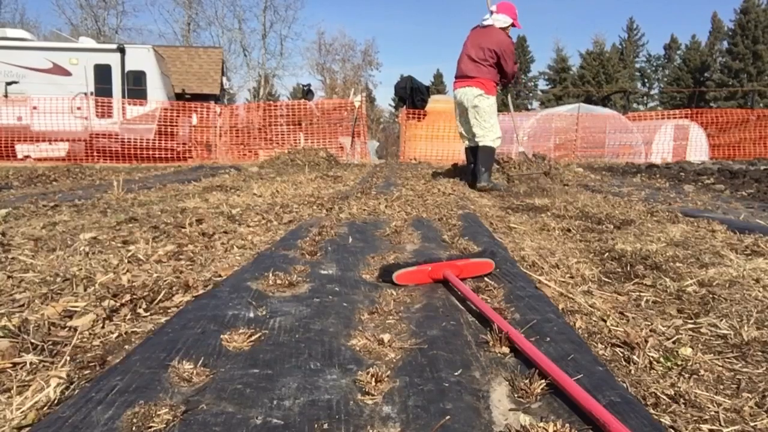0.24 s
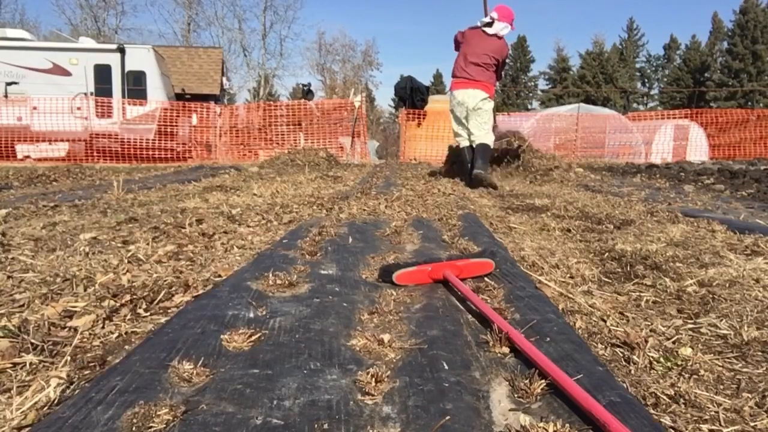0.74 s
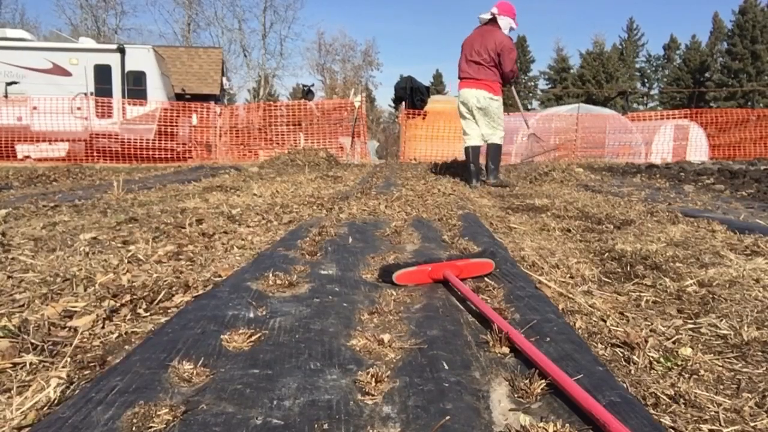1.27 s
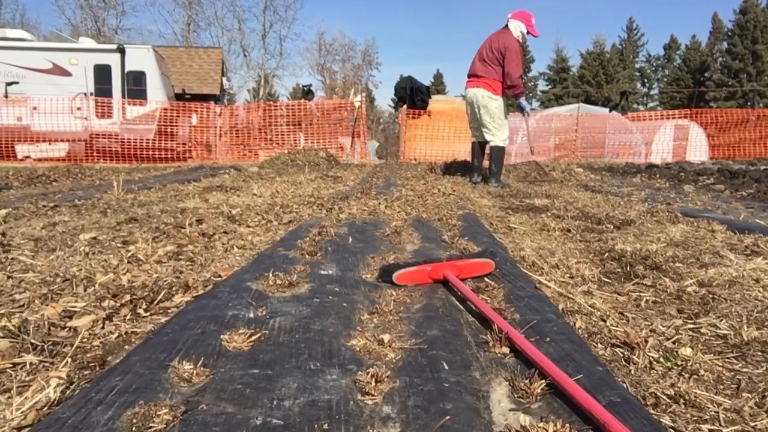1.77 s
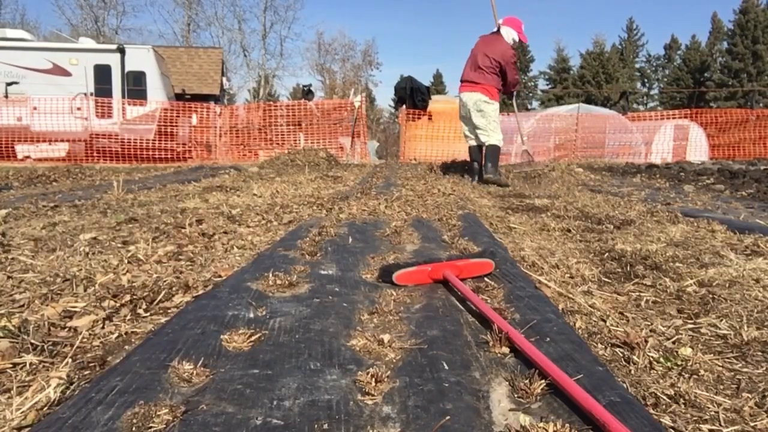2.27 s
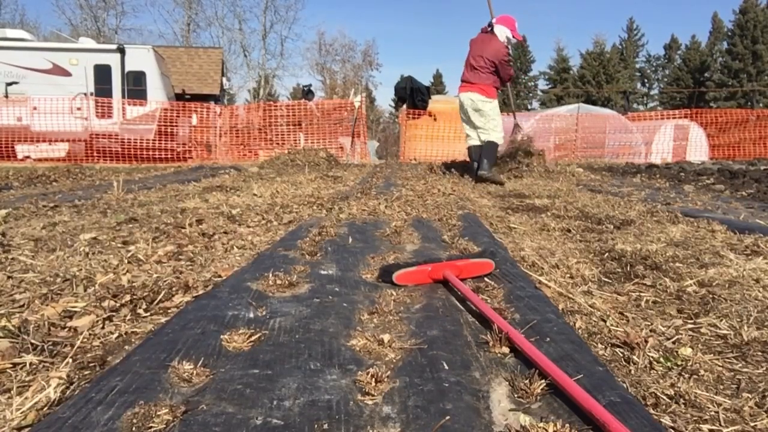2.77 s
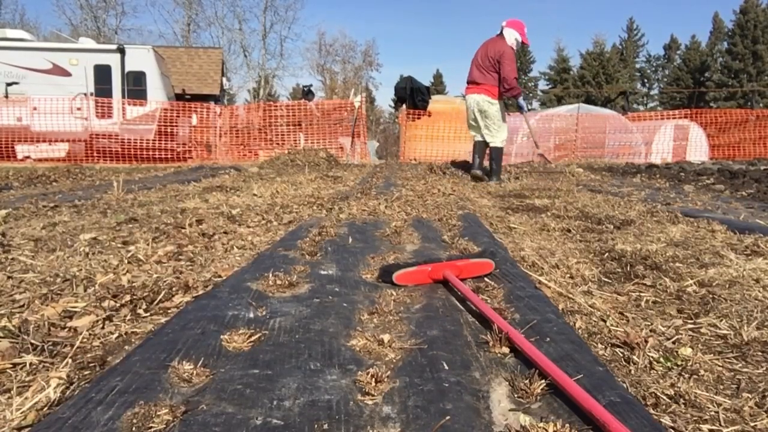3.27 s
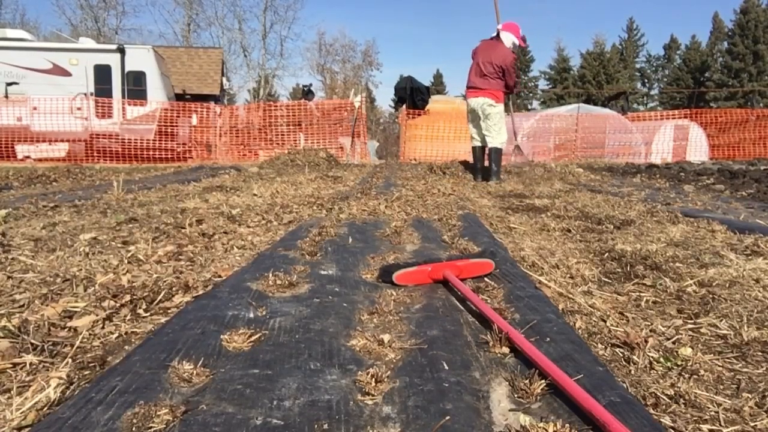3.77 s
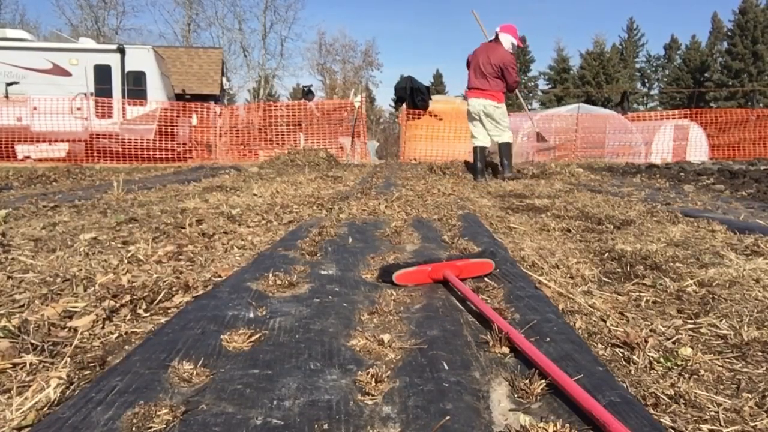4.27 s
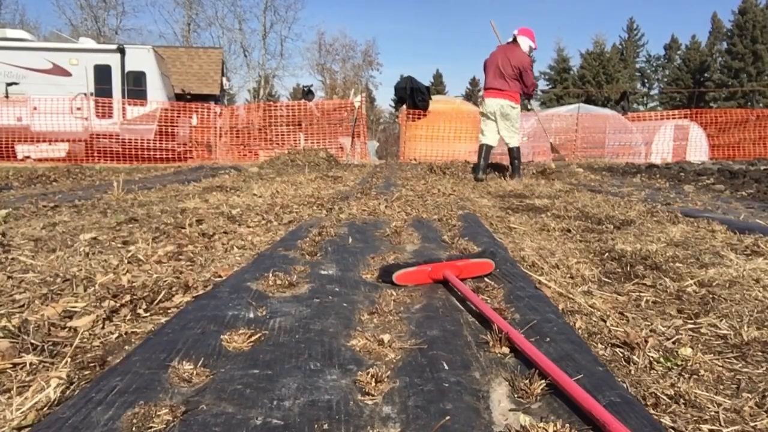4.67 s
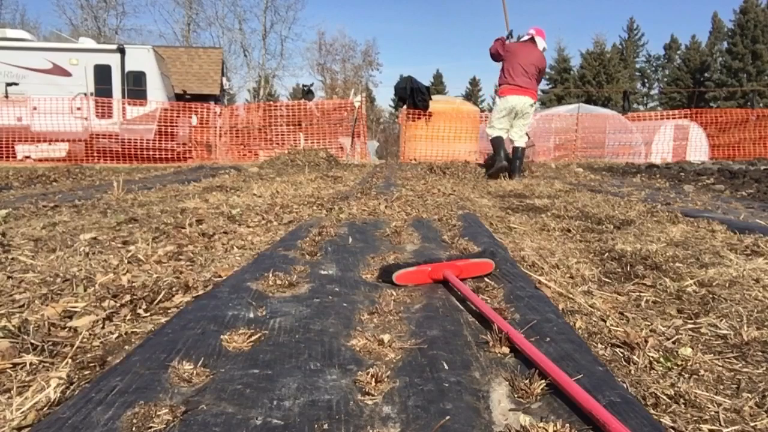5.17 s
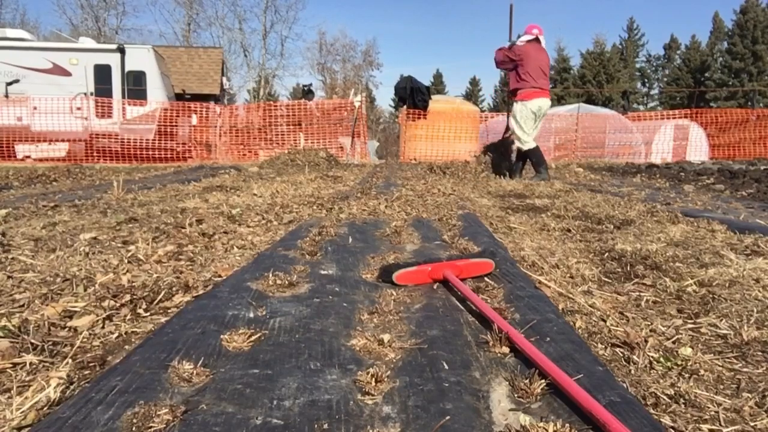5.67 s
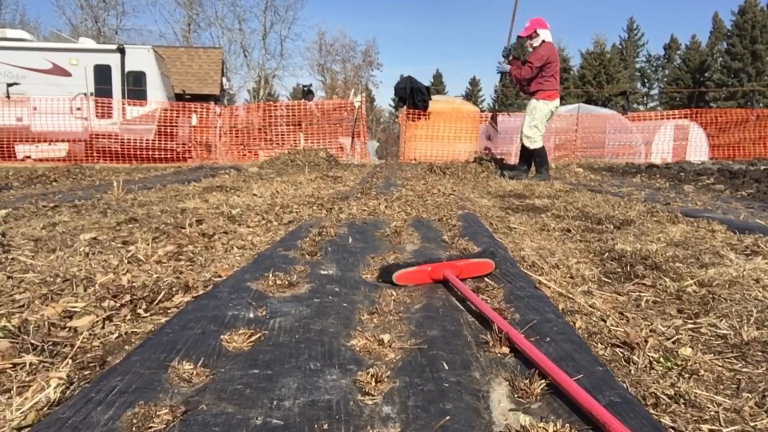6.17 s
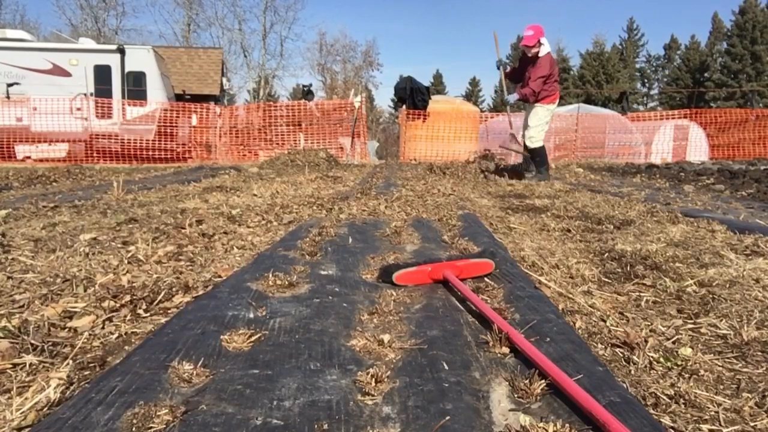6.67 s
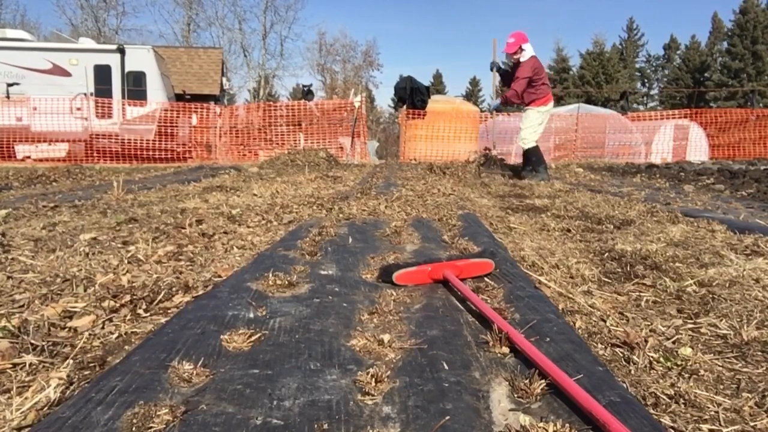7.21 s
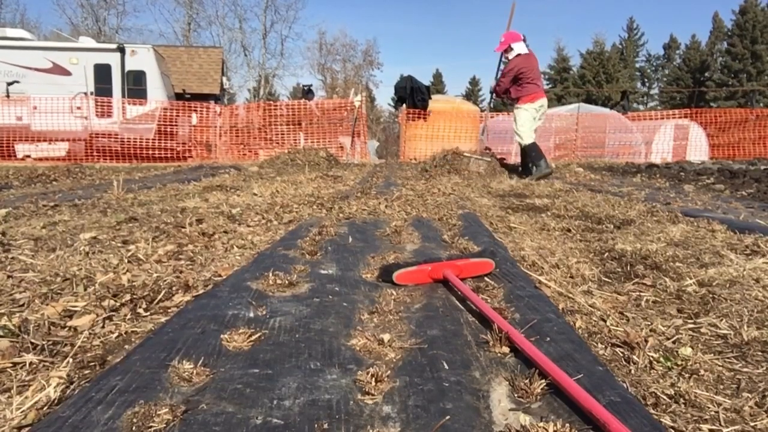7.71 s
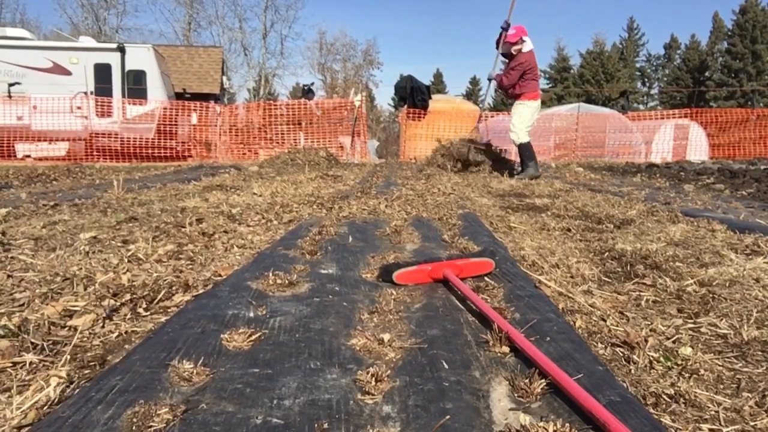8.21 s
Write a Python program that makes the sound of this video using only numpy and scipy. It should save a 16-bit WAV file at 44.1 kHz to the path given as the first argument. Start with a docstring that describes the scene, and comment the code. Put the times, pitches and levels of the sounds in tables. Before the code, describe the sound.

Outdoors in an open garden, a rake some metres away drags through dry straw and dead leaves in short, crackling, gritty strokes. Early on, its tines clack twice against something hard and chatter faintly. Light wind tugs at a microphone near the ground. After about six seconds a strong gust bursts in, with deep buffeting rumble, rushing air and nearby straw rustling and snapping, then eases sharply.

```python
"""An open garden: some metres away a rake is dragged through dry straw and dead leaves.
Pulls are crackles coloured as scrape, rasp and rustle; two noise-and-ring tine clacks end in a chatter.
Wind tugs at a microphone near the ground as rumbling noise, then a strong gust buffets it with pulses
and stirs the straw close by: rushing noise, dense crackle and short splintering snaps."""
import sys
import numpy as np
from scipy import signal
from scipy.fft import rfft, irfft, next_fast_len
from scipy.io import wavfile
from scipy.ndimage import uniform_filter1d

SR = 44100
rng = np.random.default_rng(int(sys.argv[2]) if len(sys.argv) > 2 else 0)


def master_out(mix):
    """Clip the mix to full scale and print it as 16-bit PCM to the path in sys.argv[1]."""
    frames = np.transpose(np.atleast_2d(mix))
    ceiling = np.clip(frames, -1, 1)
    pcm = np.round(ceiling * 32767).astype(np.int16)
    wavfile.write(sys.argv[1], SR, pcm)


N = 372644
TIME = np.arange(N) / SR  # s
GUST_START_S = 6.022

# Spectra of the dragged litter: soil, stalks, straw. Each row: frequency in Hz, relative level in dB per Hz.
SCRAPE_SPECTRUM = [(250, -13), (450, 2), (600, 1.5), (850, 2.5), (1150, 4), (1400, -1.5), (1800, -8.5),
                   (3000, -31)]
RASP_SPECTRUM = [(900, -17), (1400, -3.5), (1900, -2), (2400, -4.5), (3000, -8.5), (4500, -17), (9000, -45)]
RUSTLE_SPECTRUM = [(1800, -37), (2900, -5), (3600, -1), (6000, -0.5), (7200, -2.5), (8300, -6), (11500, -6),
                   (15500, -10.5)]


def rake(rasp_trim_db=-0.5, catch_db=1.08):
    """The head grinds over the soil while dragged straw crackles, more densely the harder it is pulled."""
    soil, stalks, straw = stroke_levels()
    catching = catch_db * drift(22)  # tines catch and let go
    cracks_per_s = 9000 * from_db(.4 * np.clip(straw + 58, -20, 0))
    layers = [(soil, SCRAPE_SPECTRUM), (stalks + rasp_trim_db, RASP_SPECTRUM), (straw, RUSTLE_SPECTRUM)]
    out = 0
    for level_db, spectrum in layers:
        cracks = crackle(cracks_per_s, spread_db=1.5, width_hz=1800, clump_db=3.0)
        heard = cracks + scatter(cracks, t60=0.07)
        out = out + from_db(level_db + catching) * rms_one(colour(heard, spectrum))
    return out


# Pulls of the rake. Each row: time under way in seconds, hold, rise and fall in seconds,
# then the levels of soil scrape, stalk rasp and straw rustle in dB, before trim and catching.
STROKES = [(0.0, 0.19, .05, 0.26, -57.5, -61.5, -57.5), (0.395, 0.41, 0.13, 0.18, -62.5, -65.5, -66.5),
           (1.016, 0.69, 0.22, 0.25, -73.5, -71, -79), (1.783, 0.21, 0.35, 0.24, -60.5, -60, -62),
           (2.228, 0.32, 0.31, 0.16, -67, -74.5, -74), (2.867, 0.062, .1, .1, -70.5, -71, -74),
           (3.082, 0.06, 0.19, 0.21, -62, -58.5, -63), (3.27, 0.13, .14, 0.25, -61, -63.5, -62.5),
           (3.74, .2, 0.6, .16, -71.5, -81, -75.5), (4.256, 0.1, 0.21, 0.34, -63.5, -65, -64),
           (4.83, 0.11, 0.044, 0.39, -64, -67, -71.5), (5.106, 0.086, 0.17, 0.32, -83, -80, -63.5),
           (5.44, 0.06, 0.12, 0.26, -74, -90, -74.5)]


def stroke_levels(rest_db=-88):
    """Levels of scrape, rasp and rustle in dB; overlapping pulls add in power."""
    power = from_db(rest_db) ** 2
    for start, hold, rise, fall, *levels_db in STROKES:
        power = power + (from_db(levels_db)[:, None] * pull(start, hold, rise, fall)) ** 2
    return 10 * np.log10(power)


def pull(start, hold, rise, fall, curve=1.13):
    """Envelope of one pull: it gathers speed, holds and slackens."""
    ramp = np.minimum((TIME - start) / rise, (start + hold - TIME) / fall) + 1
    return np.clip(ramp, 0, 1) ** curve  # a power above 1 makes gentle starts and ends


def crackle(per_s, spread_db, width_hz, clump_db, count=20):
    """Stalks crack at random, mostly small; each group rings at its own pitch in clumps of its own."""
    sizes = from_db(spread_db * np.minimum(rng.exponential(1, N), 4.5)) * rng.choice([-1, 1], N)
    clicks = sizes * (rng.random(N) < per_s / SR) / np.sqrt(per_s)  # even power at any density
    group = rng.integers(0, count, N)
    out = 0
    for k, hz in enumerate(np.linspace(500, 15500, count)):
        clumps = from_db(clump_db * drift(17))
        out = out + resonance(clicks * (group == k) * clumps, hz, width_hz)
    return rms_one(out)


def scatter(x, t60):
    """Ground litter and the garden smear each distant crack into a short diffuse tail."""
    keep = from_db(-120 / (t60 * SR))  # decay of power per sample
    power = signal.lfilter([1 - keep], [1, -keep], x * x)
    return np.sqrt(power + 1e-12) * rng.standard_normal(N)


# Tines striking something hard. Each row: start in seconds, level in dB.
CLACKS = [(0.6447, -48.5), (0.7420, -35.5)]


def clacks(tick_db=-68.5, tick_t60=0.034, ring_db=-69, ring_t60=0.059, gap_s=.0367, count=14):
    """After the last hard blow the springy head chatters on in faint ticks of hiss with one high ring."""
    out, age = np.zeros(N), TIME[:SR // 5]
    for s, db in CLACKS:
        add(out, s, from_db(db) * tine_blow())
    last_blow_s = CLACKS[-1][0]
    for k in range(1, count + 1):
        hiss = rms_one(resonance(rng.standard_normal(len(age)), hz=10000, width_hz=13000))
        ring = rms_one(resonance(rng.standard_normal(len(age)), hz=7100, width_hz=180))
        tick = from_db(tick_db) * hiss * dying(age, tick_t60)
        tick = tick + from_db(ring_db) * ring * dying(age, ring_t60)
        when = last_blow_s + k * gap_s + rng.normal(0, .003)
        add(out, when, from_db(rng.normal(0, 2.5)) * tick)
    return out


# Spectrum of a blow. Each row: frequency in Hz, relative level in dB per Hz.
CLACK_SPECTRUM = [(700, 9), (1800, 1), (3500, 12.5), (5000, 3), (7200, 4), (10000, 7.5), (15500, -9)]


def tine_blow(crack_t60=0.0022, rattle_t60=0.054, rattle_db=-7,
              scatter_db=-17, scatter_t60=0.48, ring_db=-6, crumble_db=4.0):
    """One blow: sharp crack, brief rattle, ring of the tines and an uneven tail scattered in the garden."""
    age = TIME[:SR // 2]
    noise = rms_one(colour(rng.standard_normal(N), CLACK_SPECTRUM))[-len(age):]
    crack = dying(age, crack_t60)
    rattle = from_db(rattle_db) * dying(age, rattle_t60)
    tail = from_db(scatter_db + crumble_db * drift(76)[:len(age)]) * dying(age, scatter_t60)
    return noise * (crack + rattle + tail) + from_db(ring_db) * tine_ring(age)


# Ringing modes of the tines. Each row: frequency in Hz, relative level in dB, 60 dB decay time in seconds.
TINE_MODES = [(1595, -17, 0.23), (2080, -13, 0.18), (2520, -37, 0.14), (3780, -14, .1), (3680, -6.5, 0.058),
              (6713, -29, .1), (6950, 0, 0.052), (7440, 0, 0.051), (8900, -24, .07), (9350, -4, 0.049),
              (11800, -26, .08)]


def tine_ring(age):
    """The modes of the tines decay as sines, each struck with a strength of its own."""
    out = 0
    for hz, db, t60 in TINE_MODES:
        strength = from_db(db + rng.normal(0, 1.3))
        out = out + strength * np.sin(2 * np.pi * hz * age) * dying(age, t60)
    return out


# Short snaps and ticks: last ticks of the tine chatter, then stalks and leaves snapping.
# Each row: start in seconds, level in dB, centre in Hz, nominal width in Hz.
SNAPS = [(1.318, -66, 7000, 8000), (1.355, -59.5, 7000, 9000), (1.429, -57, 3880, 900),
         (1.431, -60, 7500, 8000), (2.808, -63, 7500, 8000), (2.861, -62, 7000, 8000),
         (3.124, -48, 1330, 700), (5.445, -57.5, 1050, 300), (5.501, -68, 7000, 5000),
         (5.716, -67, 7000, 6000), (6.031, -54, 3900, 1500), (6.051, -50, 7000, 4000),
         (6.08, -48, 5900, 600), (6.1227, -47.5, 6300, 6000), (6.201, -51.5, 2650, 500),
         (6.307, -48.5, 5940, 1800), (6.6, -46, 5860, 5000), (6.993, -49.5, 6450, 900),
         (7.136, -47, 5130, 1500), (7.421, -53, 5500, 2480), (7.554, -53, 5000, 2960),
         (8.152, -65, 9500, 5000), (8.291, -55.5, 4380, 1800)]


def snaps(t60_at_1khz=0.043, shortening=0.22, tail_t60=0.053, tail_db=-20):
    """Each snap or tick is a short splintering burst around its own pitch; broad ones die sooner."""
    out, age = np.zeros(N), TIME[:SR // 5]
    for s, db, hz, width_hz in [*SNAPS, *small_snaps()]:
        t60 = t60_at_1khz * (width_hz / 1000) ** -shortening
        burst = rng.standard_normal(len(age))
        for _ in range(2):  # two passes, each wider, for steeper sides
            burst = resonance(burst, hz, width_hz * 1.2)
        envelope = dying(age, t60) + from_db(tail_db) * dying(age, tail_t60)
        add(out, s, from_db(db) * rms_one(burst) * envelope)
    return out


def small_snaps(per_s=4, level_db=-73.5, spread_db=4, low_hz=3500, high_hz=8000, width_hz=5000):
    """Faint chance snaps as rows: start in seconds, level in dB, centre and nominal width in Hz."""
    draws = rng.random((int(per_s * N / SR), 3))
    return [(u * N / SR, level_db + spread_db * (2 * v - 1), low_hz + w * (high_hz - low_hz), width_hz)
            for u, v, w in draws]


# Straw stirred close by. Each row: time in seconds, rush of air through the litter in dB,
# rustle of leaves in dB, both before trim and flutter.
STIR = [(6.03, -64.5, -60), (6.3, -66, -58), (6.52, -68, -59), (6.7, -59.5, -57), (7.13, -51, -54),
        (7.25, -56, -57.5), (7.7, -58.5, -58.5), (8.45, -66, -61.5)]
# Spectra of the near leaves and of the rush. Each row: frequency in Hz, relative level in dB per Hz.
NEAR_RUSTLE_SPECTRUM = [(1000, -1.5), (1800, 2), (2800, 0.5), (4200, 0.5), (6200, 1), (9000, -2),
                        (11500, -6), (15500, -10)]
RUSH_SPECTRUM = [(300, -20), (600, 3.5), (900, 4), (1300, 1), (2000, -13), (3000, -34)]


def stirred_straw(rise_s=0.0027, rush_trim_db=-1, flutter_db=2.5, gusty_db=1.3,
                  drop_at_s=7.715, drop_db=5, drop_s=0.016):
    """The near rush of air and the rustle of leaves, crackling in clumps, start abruptly."""
    flow, leaves = in_time(STIR)
    grains = crackle(per_s=16000, spread_db=2.8, width_hz=1100, clump_db=1.8)
    rustle = from_db(leaves + gusty_db * drift(11)) * rms_one(colour(grains, NEAR_RUSTLE_SPECTRUM))
    air = rms_one(colour(rng.standard_normal(N), RUSH_SPECTRUM))
    rush = from_db(flow + rush_trim_db + flutter_db * drift(13)) * air
    onset = np.clip((TIME - GUST_START_S) / rise_s, 0, 1)
    # they drop abruptly in level
    drop = from_db(-drop_db * np.clip((TIME - drop_at_s) / drop_s + .5, 0, 1))
    return onset * drop * (rustle + rush)


# The strongest eddies that hit the microphone. Each row: time in seconds, peak in dB before trim and
# filtering, pitch in Hz.
BUFFETS = [(1.152, -35, 79.6), (1.26, -34.5, 119), (1.361, -28, 143), (1.664, -31, 101), (1.83, -32.5, 148),
           (1.886, -40, 109), (2.356, -38.5, 101), (2.587, -45, 103), (2.838, -44, 95), (3.57, -24.5, 86),
           (3.582, -38, 84), (4.558, -33, 75), (4.645, -24, 104), (4.681, -30.5, 86.4),
           (5.298, -36.5, 74.5), (5.941, -42.5, 95), (6.188, -11, 76), (6.342, -16, 59.4), (6.4, -15, 75),
           (6.439, -7.5, 90), (6.456, -14.5, 159), (6.681, -8, 114), (6.732, -21, 115), (6.784, -9.5, 123),
           (6.793, -15, 129), (6.885, -15, 238), (6.891, -10.5, 58), (7.03, -9, 99), (7.045, -10, 206),
           (7.109, -10, 107), (7.334, -8, 80), (7.383, -9, 99), (7.445, -14.5, 161), (7.595, -11.5, 110),
           (8.219, -28.5, 114), (8.254, -17, 99)]


def buffets(trim_db=-1, wake_db=-14, wake_t60=0.07, wake_top_hz=450, edge_ratio=6.6, edge_hz=1300):
    """A passing eddy swings the membrane one way then the other, trailed by weaker ones and a dull wake."""
    out, age = np.zeros(N), TIME[:SR // 5] - .05
    dull = signal.butter(2, wake_top_hz, fs=SR, output="sos")
    for s, db, hz in [*BUFFETS, *small_eddies()]:
        eddy = eddy_pulse(age, hz)
        trail = eddy_trail(age, hz)
        smeared = irfft(rfft(eddy) * rfft(rng.standard_normal(len(age))), len(age))
        wake = rms_one(signal.sosfilt(dull, smeared))
        swell = dying(np.abs(age), wake_t60) * (1 + np.tanh(age / 0.0076)) / 2
        edge = signal.butter(4, min(edge_ratio * hz, edge_hz), fs=SR, output="sos")
        hit = signal.sosfilt(edge, eddy + trail + from_db(wake_db) * swell * wake)
        add(out, s + age[0], from_db(db + trim_db) * hit)
    return out


def eddy_trail(age, hz, gap_s=.011, first_db=-8, loss_db=6.5, count=3):
    """Ever weaker eddies of either sign follow the first, up to an octave lower and unevenly spaced."""
    out = 0
    for k, (sign, late, octaves) in enumerate(rng.random((count, 3))):
        pulse = eddy_pulse(age - gap_s * (k + late + .5), hz * 2 ** -octaves)
        out = out + np.sign(sign - .5) * from_db(first_db - loss_db * k) * pulse
    return out


def eddy_pulse(age, hz):
    """The two-way pressure swing of one eddy passing at age 0, with peak 1."""
    phase = 2 * np.pi * hz * age
    pulse = phase / (1 + phase ** 2) ** 2
    return pulse / pulse.max()


def small_eddies(per_s=7, middle_hz=90, spread_db=1):
    """Chance eddies, as strong as the wind that carries them, as rows like those of the strong ones."""
    level = wind_level()
    slots = np.arange(0, N / SR, 1 / per_s)
    rows = []
    for slot, (u, v, w) in zip(slots, rng.random((len(slots), 3))):
        s = slot + u / per_s
        rows.append((s, np.interp(s, TIME, level) + spread_db * (2 * v - 1), middle_hz * 2 ** (w - .5)))
    return rows


# Puffs that swell the rumble. Each row: crest in seconds, Gaussian half length in seconds,
# level in dB before the swirl trim.
PUFFS = [(0.168, 0.013, -43.5), (0.629, 0.021, -37), (1.28, 0.026, -38), (1.365, 0.0061, -27),
         (1.43, 0.011, -37), (1.613, 0.024, -42), (1.89, 0.0073, -32), (2.363, 0.01, -38),
         (2.59, 0.012, -55), (3.165, 0.016, -42.5), (3.576, 0.0079, -27), (3.716, .015, -44),
         (4.49, 0.037, -33), (4.654, 0.022, -33.5), (5.101, 0.024, -39), (5.34, 0.058, -40),
         (6.064, 0.021, -17.5), (6.222, 0.025, -17.5), (6.452, 0.028, -13), (6.768, 0.037, -12.5),
         (6.889, 0.0075, -5.5), (7.036, 0.022, -17), (7.243, 0.015, -9.5), (7.377, 0.071, -11),
         (7.542, 0.011, -11.5), (7.619, 0.015, -10), (8.052, 0.027, -25), (8.275, 0.04, -26)]
# Spectra of slow swirls and fine turbulence. Each row: frequency in Hz, relative level in dB per Hz.
SWIRL_SPECTRUM = [(22, -24.5), (35, -4.5), (50, 1.5), (70, 0.5), (100, -5), (150, -16.5), (250, -29),
                  (400, -63)]
TURBULENCE_SPECTRUM = [(80, -22), (140, 6), (220, -0.5), (320, -9), (450, -20), (650, -28), (1000, -38),
                       (1500, -60)]


def wind(swirl_db=-2, turbulence_db=-15, lumpy_db=2.0, flutter_db=4.5,
         follows=.97, pivot_db=-47, puff_turbulence_db=-5):
    """Slow swirls rumble at the microphone in puffs; finer turbulence rides on them in lumps."""
    swells = 0
    for s, half, db in PUFFS:
        puff = np.exp(-.5 * np.minimum(((TIME - s) / half) ** 2, 100))
        swells = swells + (from_db(db) * puff) ** 2
    steady = from_db(wind_level()) ** 2
    # puffs are smooth: they count less in the fine turbulence
    stirring_db = 10 * np.log10(steady + from_db(puff_turbulence_db) ** 2 * swells)
    fine_db = pivot_db + follows * (stirring_db - pivot_db)  # dB of turbulence per dB of wind
    flutter = flutter_db * drift(15.3)
    swirl_gain = from_db(swirl_db) * np.sqrt(steady * from_db(flutter) ** 2 + swells)
    swirl = swirl_gain * even_noise(SWIRL_SPECTRUM, window_s=0.0364)
    lumps = from_db(fine_db + turbulence_db + flutter + lumpy_db * drift(29.5))
    return swirl + lumps * even_noise(TURBULENCE_SPECTRUM, window_s=0.0308)


# Strength of the light breeze, then of the gust. Each row: time in seconds, level in dB before trims.
BREEZE = [(0.0, -51), (0.5, -50), (0.75, -44), (0.95, -50), (1.3, -49), (1.87, -44), (1.97, -56),
          (2.45, -52.5), (3.1, -59.5), (3.5, -50.5), (3.9, -54.5), (4.33, -53.5), (4.5, -42.5), (4.85, -49),
          (5.3, -45.5), (5.7, -48), (6.0, -57.5)]
GUST = [(6.03, -41), (6.15, -29.5), (6.55, -27.5), (6.76, -17), (6.97, -20.5), (7.15, -20.5), (7.38, -19),
        (7.62, -17.5), (7.78, -34.5), (8.2, -31.5), (8.45, -37)]


def wind_level():
    """Level of the wind in dB: the breeze curve, then the gust curve, crossed over in 12 ms."""
    (breeze,), (gust,) = in_time(BREEZE), in_time(GUST)
    return breeze + (gust - breeze) * np.clip((TIME - GUST_START_S) / .012 + .5, 0, 1)


# Spectrum of the open air. Each row: frequency in Hz, relative level in dB per Hz.
AIR_SPECTRUM = [(60, 7), (200, 5.5), (450, 2), (900, 0), (1500, -4.5), (2300, -7), (3200, -12), (7000, -20),
                (10000, -26), (15500, -23)]


def open_air(level_db=-66):
    """The hush of the open air: steady coloured noise."""
    return from_db(level_db) * rms_one(colour(rng.standard_normal(N), AIR_SPECTRUM))


def from_db(db):
    """Decibels to gain."""
    return 10 ** (np.asarray(db) / 20)


def rms_one(x):
    """Scale to unit rms."""
    return x / np.sqrt(np.mean(x ** 2) + 1e-20)


def in_time(rows):
    """Join the rows of a curve by straight lines, one array per column."""
    s, *columns = np.transpose(rows)
    return [np.interp(TIME, s, c) for c in columns]


def drift(rate_hz, step=40):
    """Slow chance with spread 1: noise through two equal poles, drawn once every few samples."""
    r = np.exp(-2 * np.pi * rate_hz * step / SR)
    slow = signal.lfilter([1], [1, -2 * r, r * r], rng.standard_normal(N // step + 2002))
    slow = rms_one(slow[2000:])  # skip the filter's start
    return np.interp(np.arange(N) / step, np.arange(len(slow)), slow)


def colour(x, spectrum):
    """Causal (minimum-phase) filter with the given spectrum, falling away beyond its ends."""
    size = 2 * next_fast_len(N // 2 + SR // 2)
    octave = np.log2(np.maximum(np.arange(size // 2 + 1) * SR / size, 1))
    hz, db = np.transpose(spectrum)
    outside = np.abs(octave - np.clip(octave, np.log2(hz[0]), np.log2(hz[-1])))
    gain_db = np.interp(octave, np.log2(hz), db) - 20 * outside  # 20 dB per octave outside
    cepstrum = irfft(np.log(from_db(gain_db)))
    cepstrum[1:size // 2] *= 2  # folding the cepstrum gives minimum phase
    cepstrum[size // 2 + 1:] = 0
    return irfft(rfft(x, size) * np.exp(rfft(cepstrum)))[:N]


def even_noise(spectrum, window_s):
    """Coloured noise whose slow chance swells are evened out."""
    x = colour(rng.standard_normal(N), spectrum)
    return x / np.sqrt(uniform_filter1d(x * x, max(int(window_s * SR), 2)) + 1e-12)


def resonance(x, hz, width_hz):
    """Two-pole band-pass with gain 1 on top."""
    r = np.exp(-np.pi * width_hz / SR)
    zeros = np.array([1, 0, -1]) * (1 - r * r) / 2
    poles = [1, -2 * r * np.cos(2 * np.pi * hz / SR), r * r]
    return signal.lfilter(zeros, poles, x + 1e-18)


def dying(age, t60):
    """Exponential decay that starts at age 0 and loses 60 dB in t60 seconds."""
    return (age >= 0) * from_db(-60 * np.clip(age / t60, 0, 10))


def add(out, s, sound):
    """Mix a short sound in at time s."""
    start = max(round(s * SR), 0)
    out[start:start + len(sound)] += sound[:max(N - start, 0)]


def scene():
    """Rake, straw and wind over the hush of the open air."""
    garden = rake() + clacks() + snaps() + stirred_straw()
    return (garden + buffets() + wind() + open_air())[None]


# Dips in the microphone's response. Each row: centre in Hz, width in Hz, depth from 0 to 1.
PORT_DIPS = [(457, 99, 0.27), (2860, 420, 0.16), (4930, 164, 0.95), (10400, 330, 0.7)]


def record(dry):
    """The microphone's port notches the sound; deep bass and the top are cut."""
    for hz, width_hz, depth in PORT_DIPS:
        dry = dry - depth * resonance(dry, hz, width_hz)
    dry = signal.sosfilt(signal.butter(4, 37, "high", fs=SR, output="sos"), dry)
    return signal.sosfilt(signal.ellip(10, .2, 80, 15850, fs=SR, output="sos"), dry)


dry = scene()
out = record(dry)
master_out(out)
```